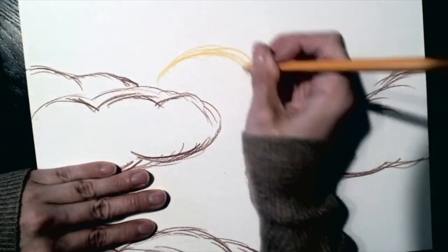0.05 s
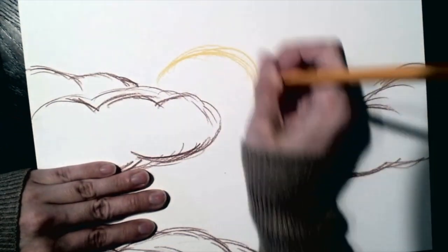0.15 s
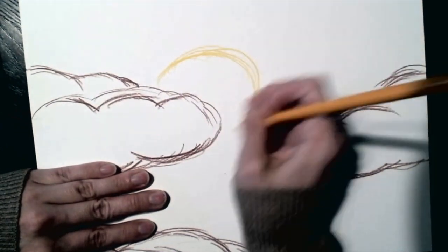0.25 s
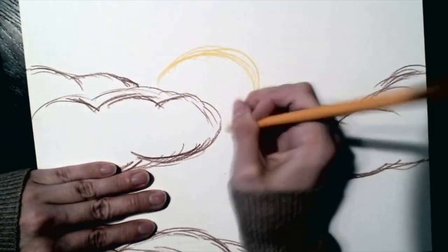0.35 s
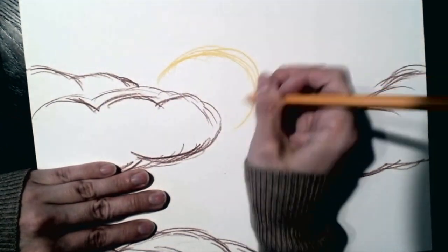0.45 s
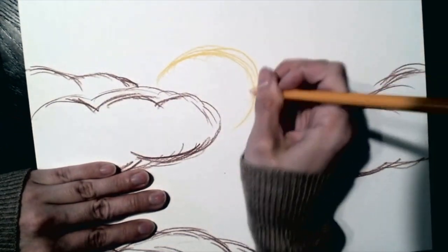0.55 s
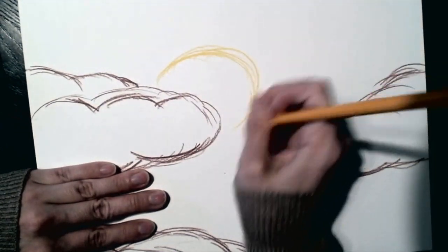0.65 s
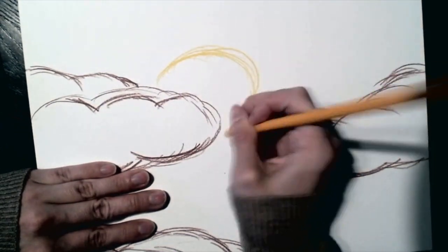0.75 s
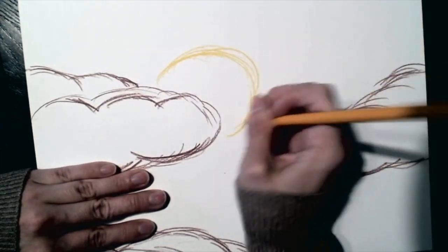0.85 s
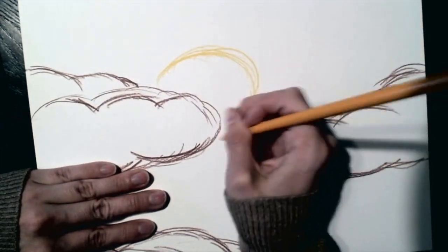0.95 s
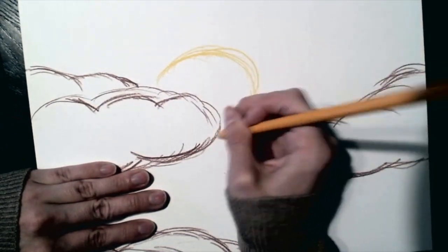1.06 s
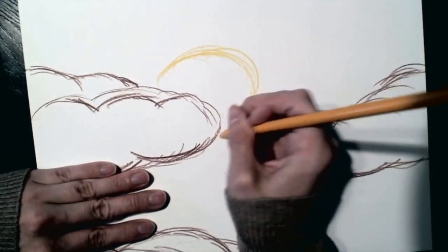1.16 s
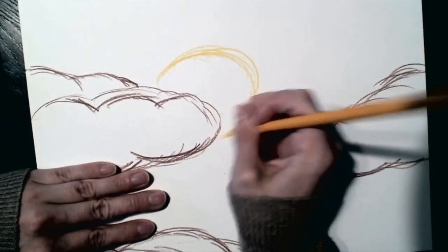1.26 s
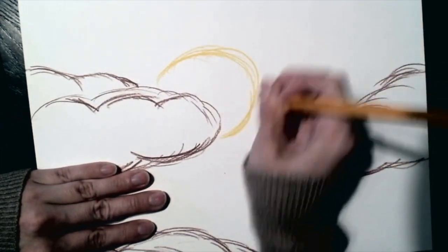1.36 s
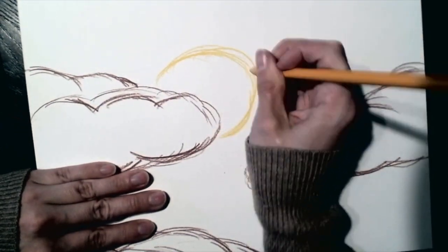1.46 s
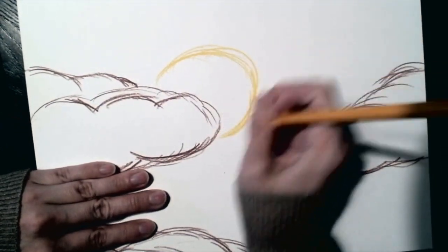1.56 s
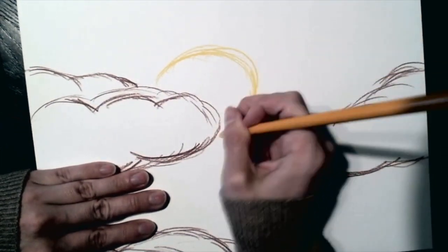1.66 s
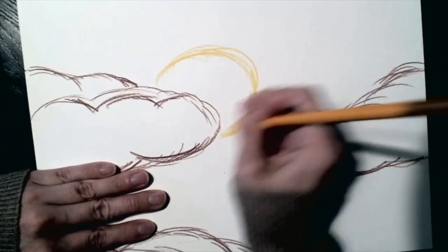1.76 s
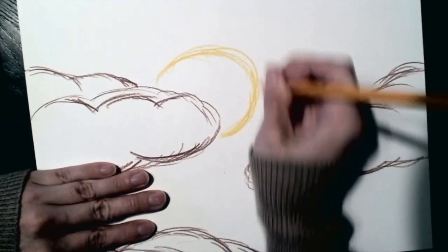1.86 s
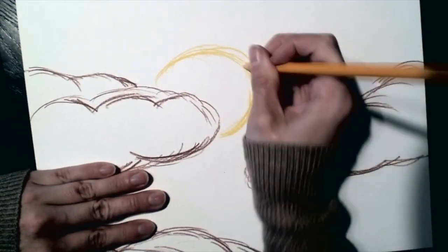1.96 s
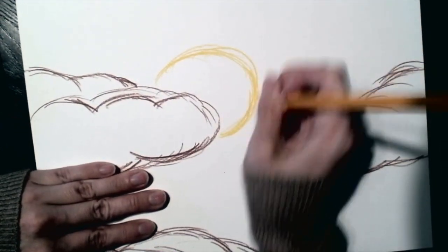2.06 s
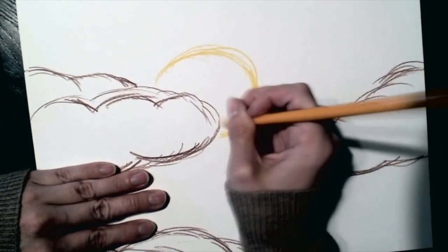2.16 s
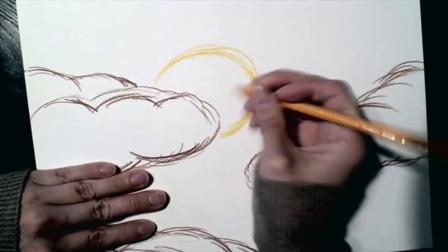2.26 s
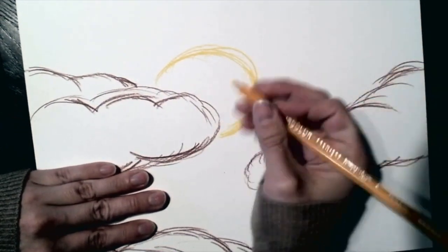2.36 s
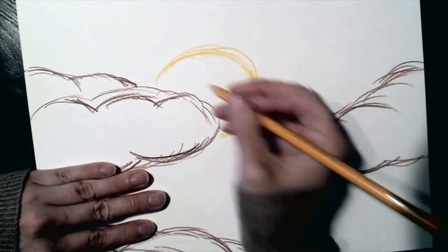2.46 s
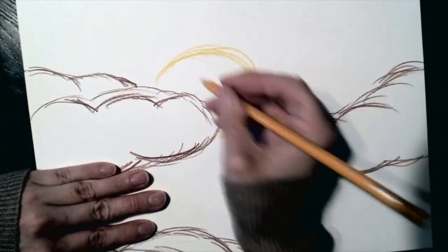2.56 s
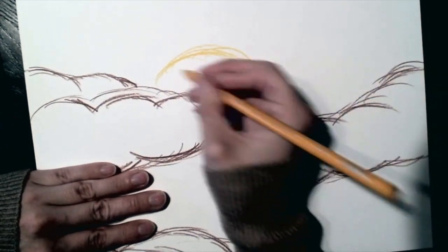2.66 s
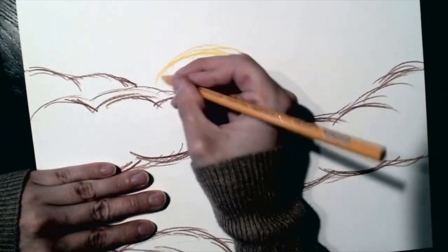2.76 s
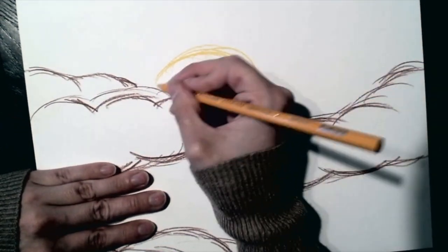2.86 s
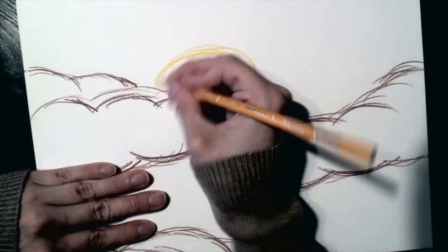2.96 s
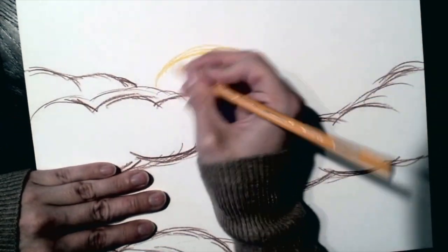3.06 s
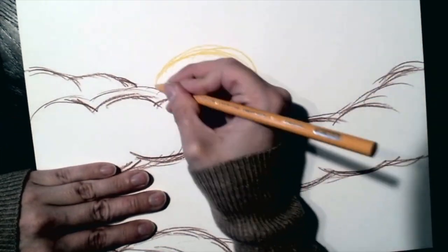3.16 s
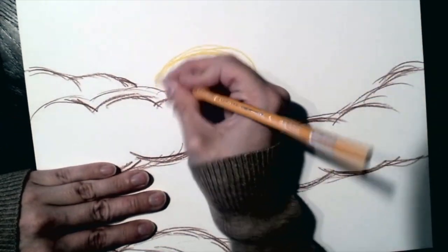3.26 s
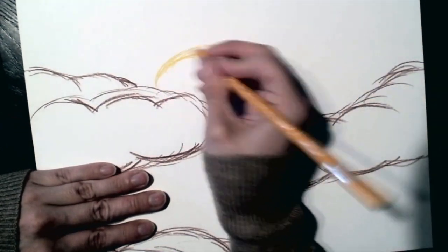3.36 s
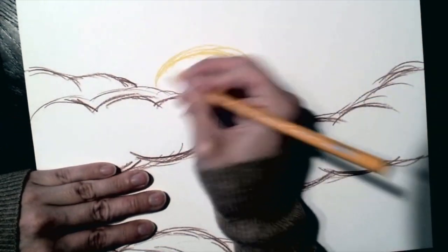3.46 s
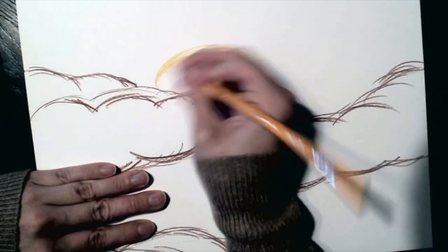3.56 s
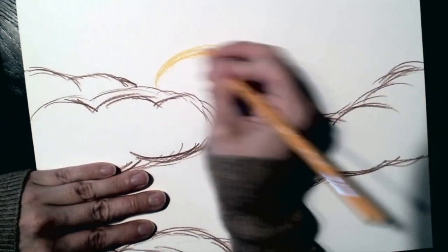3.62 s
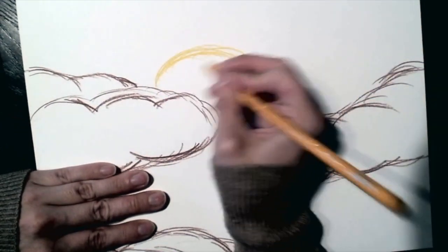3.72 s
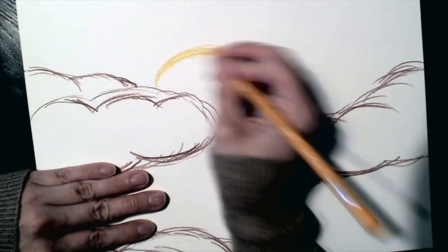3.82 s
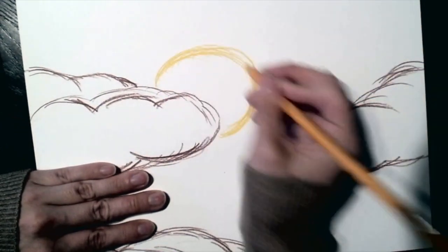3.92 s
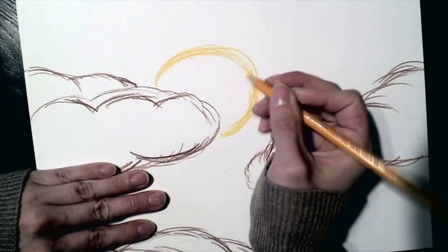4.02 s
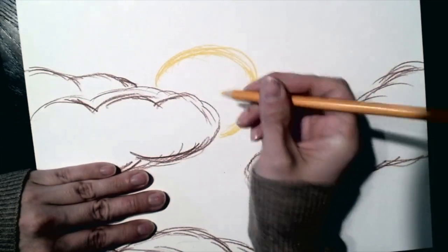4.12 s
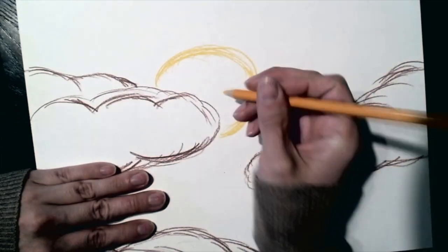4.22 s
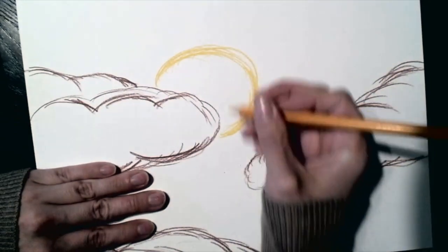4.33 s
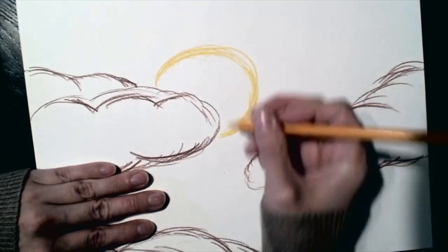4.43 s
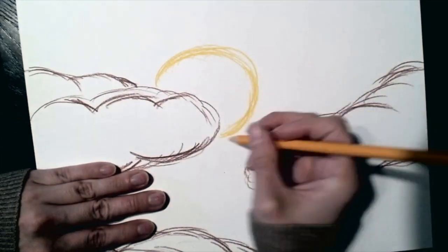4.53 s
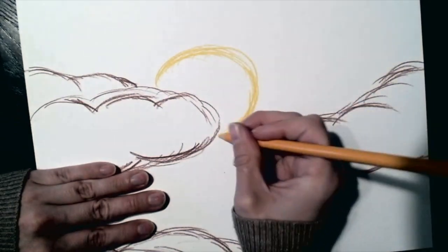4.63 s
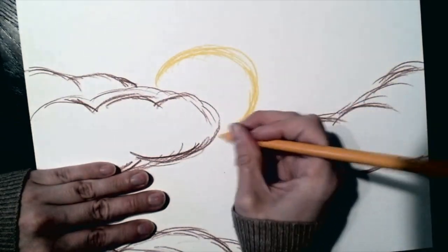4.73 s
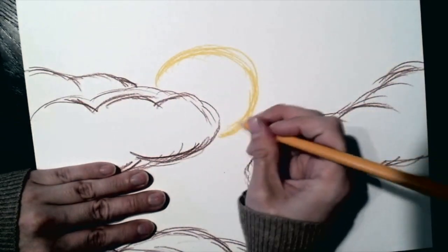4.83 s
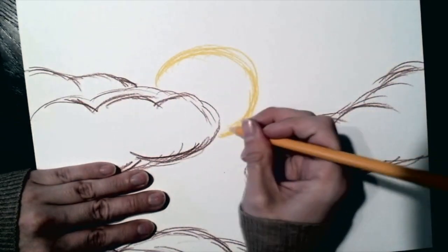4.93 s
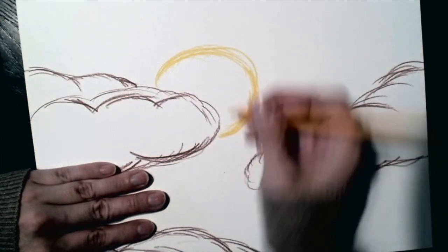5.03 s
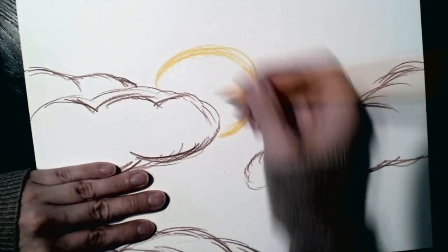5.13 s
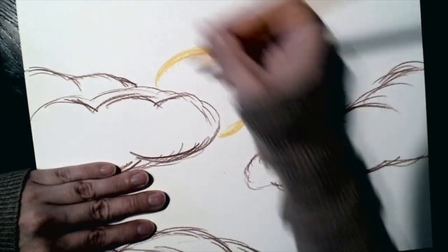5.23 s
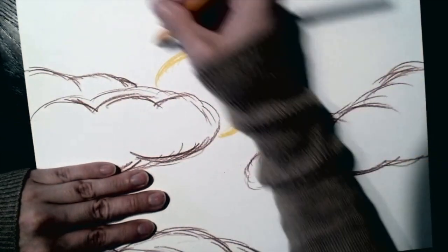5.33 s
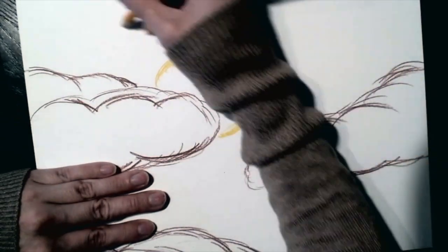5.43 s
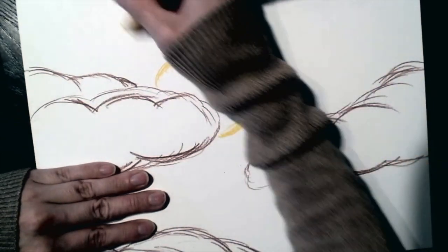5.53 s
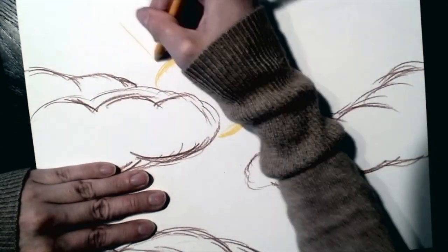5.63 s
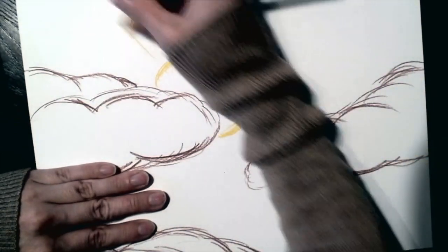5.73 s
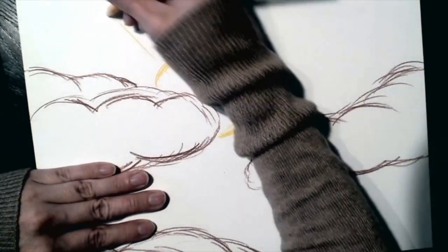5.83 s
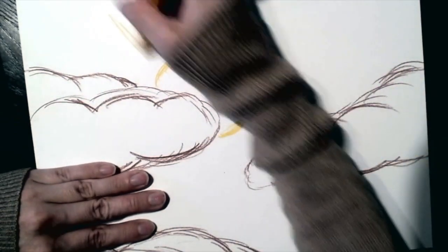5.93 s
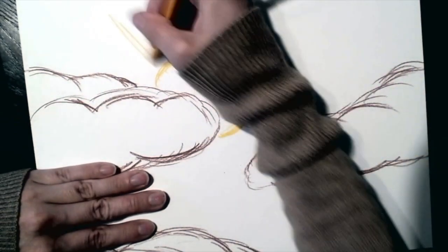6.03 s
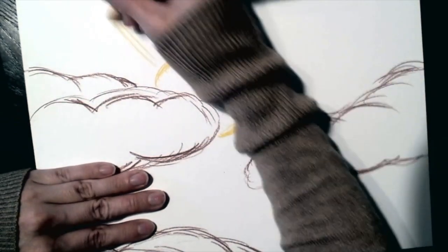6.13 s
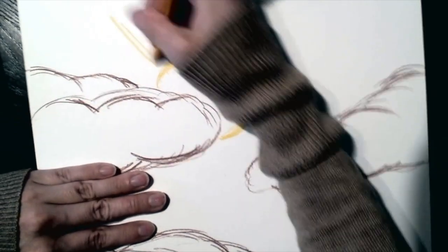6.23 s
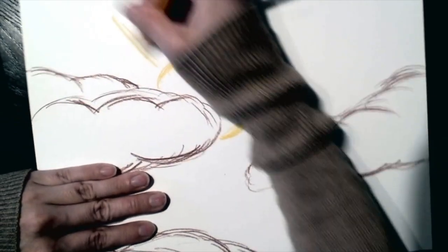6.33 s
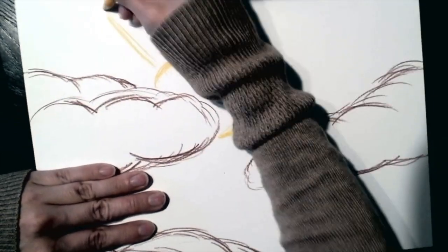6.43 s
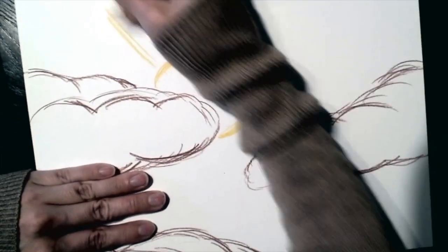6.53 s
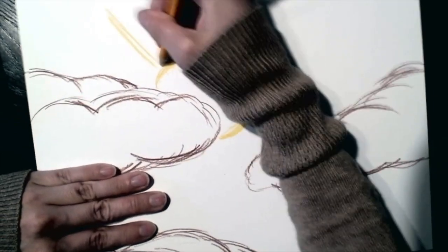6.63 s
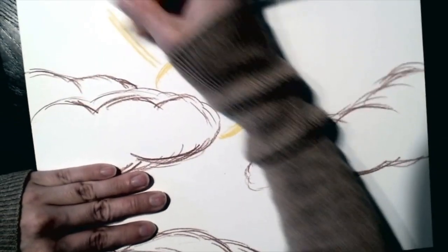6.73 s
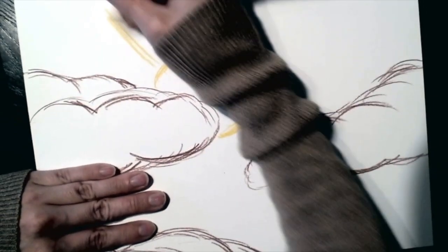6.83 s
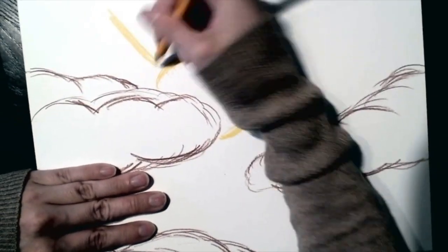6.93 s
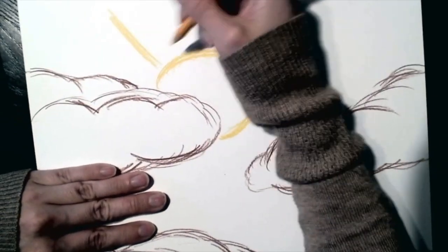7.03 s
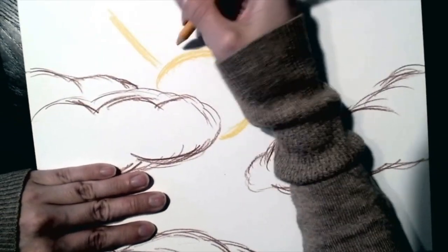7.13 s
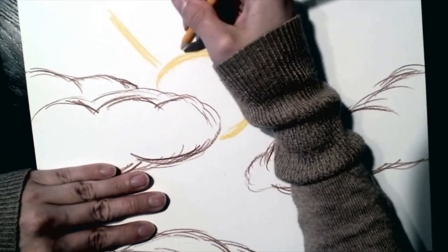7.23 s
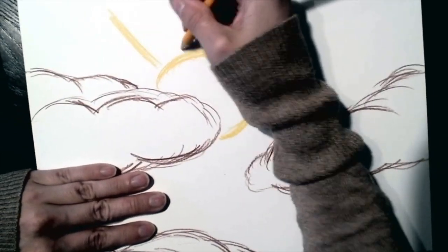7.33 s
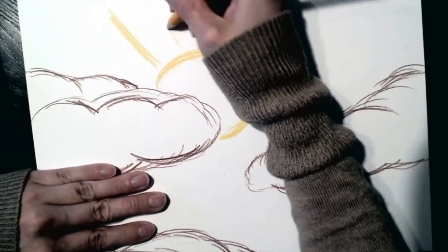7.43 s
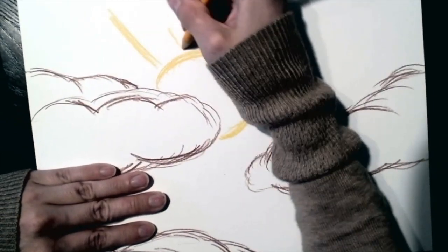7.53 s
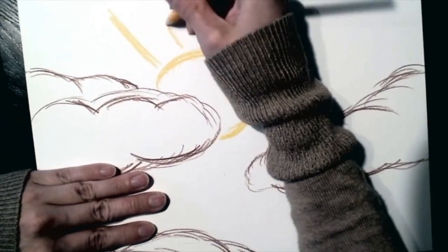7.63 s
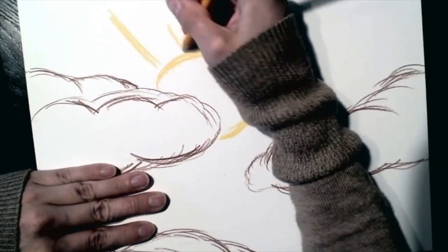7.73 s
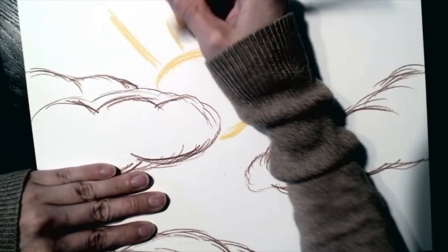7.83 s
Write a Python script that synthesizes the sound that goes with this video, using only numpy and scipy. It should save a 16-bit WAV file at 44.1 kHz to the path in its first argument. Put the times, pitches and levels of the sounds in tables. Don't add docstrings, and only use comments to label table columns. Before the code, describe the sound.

Close and dry in a quiet room, a faint low appliance hum throbs unevenly, with a barely audible thin electronic whine. At 0.1 seconds a pencil tip knocks softly on paper over a wooden table and rubs a grainy stroke; lighter ones follow at 0.5 and 0.9, each with a dull tap. A slow pull at 1.2 leads into three smoother, sustained arcs from 1.5 to 2.2. Then only soft hand and sleeve brushes until faint short strokes at 2.9, 3.2 and 3.5, with clear woody knocks at 3.2, 3.5 and 3.8, the last hardest and starting a light arc. From 4 to 5.4 it is nearly silent, with faint brushes and tiny touches. From 5.5 to 6.9 rapid back-and-forth shading rasps, louder and more resonant, about six strokes a second, with small pings and squeaks. A sleeve brush follows, then a tap at 7.3 and quick light dabs to the end.

```python
import sys
import numpy as np
from scipy import signal
from scipy.fft import rfft, irfft
from scipy.io import wavfile
from scipy.ndimage import uniform_filter1d

SR = 44100
rng = np.random.default_rng(int(sys.argv[2]) if len(sys.argv) > 2 else 0)


def undo_db(level):
    steps = np.asarray(level, float) / 20
    return 10 ** steps


def generate_wav(signal):
    frames = np.transpose(np.atleast_2d(signal))
    scaled = np.clip(frames, -1, 1) * 32767
    pcm = np.round(scaled).astype(np.int16)
    wavfile.write(sys.argv[1], SR, pcm)


N = 347508

# start in seconds, speeding up in seconds, slowing down in seconds,
# paper hiss at full speed in dB, pressure as shaft ring relative to the hiss in dB.
STROKES = [
    (.12, 0.17, 0.061, -55.5, 8),
    (.52, 0.14, 0.11, -58.5, 5.5),
    (.865, 0.1, 0.083, -62, 3),
    (2.919, 0.051, 0.079, -65.5, 10),
    (3.22, 0.083, 0.11, -64, 9),
    (3.509, 0.076, 0.13, -59.5, 3),
]
ARCS = [
    (1.465, 0.13, 0.097, -56.5, 5.5),
    (1.70, 0.15, 0.085, -56, -0.5),
    (1.945, 0.15, 0.076, -57, 4.5),
    (3.78, 0.076, .13, -61, 0),
]
SHADING = [
    (1.2, 0.24, 0.018, -58.5, 4),
    (5.51, 0.079, 0.084, -59, 12),
    (5.665, 0.11, 0.034, -55.5, 14.5),
    (5.822, 0.041, 0.11, -52.5, 16),
    (5.978, 0.097, 0.051, -53, 15),
    (6.139, 0.039, 0.12, -53, 10.5),
    (6.299, 0.099, 0.052, -52.5, 15),
    (6.46, 0.051, 0.12, -52, 11),
    (6.624, 0.11, 0.032, -53.5, 14.5),
    (6.776, 0.039, 0.095, -53, 12),
]
DABS = [
    (7.315, .065, 0.034, -63.5, 1),
    (7.418, 0.021, 0.095, -61.5, 4.5),
    (7.523, 0.053, 0.046, -60, 6.5),
    (7.628, 0.016, 0.11, -60.1, 9),
    (7.735, 0.053, 0.036, -58.5, 10),
    (7.827, 0.027, 0.046, -57.5, 6),
]
# start in seconds, speeding up in seconds,
# slowing down in seconds, hiss in dB, table rumble relative to the hiss in dB.
BRUSHES = [(-.05, 0.06, 0.17, -63.5, 1), (.3, 0.059, 0.21, -65, 3), (.75, 0.05, 0.077, -65.5, 3),
           (1.0, 0.044, 0.048, -73, -4), (2.12, 0.056, 0.55, -69, 7.5), (2.42, 0.21, .08, -68.5, -11),
           (2.6, 0.11, .07, -67, -5), (3.1, .05, 0.036, -73.5, -6), (3.4, .07, 0.083, -67.5, -5),
           (3.699, 0.057, 0.012, -61.5, 0), (3.95, 0.044, 0.13, -69.5, 4), (4.28, 0.069, 0.055, -76, 3),
           (4.72, 0.069, 0.074, -70, 9.5), (4.93, 0.09, 0.061, -75, 0.5), (5.285, 0.038, .1, -67, 4),
           (5.35, 0.089, 0.063, -66, -14), (6.87, 0.027, .14, -60, 8), (6.999, 0.032, 0.17, -68.5, 7)]
# time in seconds, rumble relative to hiss in dB.
SPOT = [(0, 10.5), (.7, 5), (1.0, 1), (1.3, 15), (1.42, 13.5), (1.6, 13), (2.1, 11.5), (3.0, 18),
        (3.33, 14.5), (3.55, 25), (3.63, 8.5), (3.84, 20), (3.92, 4.5), (5.5, 12.5), (6.2, 11), (6.9, 11.5),
        (7.4, 10.5), (7.88, 13)]
# time in seconds, grip from 0 (long and loose) to 1 (short and tight).
GRIP = [(0, 0.18), (2.3, 0.095), (2.9, 0.55), (4, 0.33), (5.4, 0.46), (6.9, 0.41), (7.3, 0.35),
        (7.88, 0.43)]
# time in seconds, peak in dB, middle modes relative in dB,
# shaft modes relative in dB, shaft pitch in Hz.
EDGE_TAPS = [
    (0.125, -18, -23, -30, 1010),
    (0.528, -22, -23, -31, 988),
    (0.875, -15, -7, -7, 986),
    (4.502, -58, -18, 0, 1420),
]
INNER_TAPS = [
    (1.183, -34.5, -11, -37, 930),
    (3.194, -18.5, -22.5, -39, 1460),
    (3.492, -16.5, -16.5, -12.5, 1305),
    (3.785, -12.5, -12, -4.5, 1350),
    (4.724, -39, -20, -24, 1020),
    (5.484, -26.5, -13, -18, 1120),
    (7.32, -24, -16.5, -4, 1176),
]
# time in seconds, peak in dB, pitch in Hz.
SNAGS = [(0.2638, -40.5, 980), (0.2868, -38.5, 1060), (0.6583, -51, 1100), (1.5932, -39.5, 1003),
         (1.6318, -41.5, 1100), (5.5937, -40, 1050), (5.7424, -34.5, 1076), (5.768, -35, 1107),
         (5.8644, -35, 1106), (5.883, -39, 1180), (6.0397, -41, 1320), (6.0688, -36.5, 1040),
         (6.1758, -42, 994), (6.1983, -39, 1100), (6.3687, -37.5, 1344), (6.4013, -45, 1110),
         (6.6905, -50, 1450), (6.8076, -39, 1020), (6.839, -43, 1170), (7.7843, -39.5, 1300)]
# time in seconds, peak in dB, pitch in Hz.
SQUEAKS = [(5.8634, -37.5, 2490), (5.879, -37, 2705), (5.8994, -48, 2840), (6.0518, -46, 2710),
           (6.193, -44.5, 2760), (6.3699, -47.5, 2660), (6.5146, -47, 2660), (6.7, -61.5, 2690),
           (6.8209, -39.5, 2740), (6.8444, -48, 2710)]
# time in seconds, level in dB, pitch in Hz.
THUDS = [
    (5.26, -58, 45),
    (5.985, -55, 40),
    (3.79, -62, 55),
]
# pitch in Hz, level in dB, time to fall 60 dB in seconds.
TABLE = [(167, -5.5, .06), (196, -1, 0.092), (235.2, 2, 0.052), (272.5, 2, 0.059), (350, 1, 0.046),
         (384, 1, 0.048), (461, -12, 0.048)]
MIDDLE = [(570, 0.5, 0.045), (646, -2, 0.0225), (769, 4.5, 0.035)]
SHAFT = [(1017.3, -7, 0.013), (1060, 0.5, 0.02), (1170, -1.5, 0.029), (1312, -2, 0.044), (1461, -3, 0.059),
         (1555, -8, 0.14)]
TIP = [(1580, 4.5, 0.0074), (1986, 3, 0.014), (2113, 3.5, 0.015), (2465, 3.5, 0.01), (2660, -5.5, 0.044),
       (2838, -1.5, 0.014)]
# frequency in Hz, level in dB per Hz.
HISS = [(1710, -10), (2900, -22.5), (3110, -9.5), (4360, -7), (4580, -8.5), (4990, -6), (5460, -11),
        (7040, -6.5), (8160, -13.5), (10400, -12.5), (13000, -18), (15200, -12), (15600, -15)]
# frequency in Hz, level in dB per Hz.
AIR = [(15, -62), (25, -43), (59, -17), (90, -4.5), (165, -8), (240, -13.5), (420, -15), (620, -30),
       (1050, -27.5), (1600, -29), (2900, -34.5), (6720, -38), (12100, -46.5), (15000, -64.5)]
# time in seconds, level in dB.
HUM = [(0.0, -58), (0.7, -55.5), (1.07, -61), (1.97, -53), (2.85, -62.5), (3.51, -57.5), (4.45, -62),
       (5.57, -61), (5.77, -55), (6.58, -51), (7.2, -58.5), (7.88, -58)]
# frequency in Hz, rms level in dB.
GATE = [(12800, -104), (13200, -101), (13400, -83), (13900, -84.5), (14600, -76), (15300, -84.5),
        (15700, -88)]

# (hiss as power of speed, overlap at the turn s,
# pressure peak from full speed 0 to mid stroke 1, its share of the stroke)
STROKE_WAY, ARC_WAY = (1.1, 0.0046, 0.26, 0.2), (0.35, 0.0048, 0.24, 0.2)
SHADING_WAY, DAB_WAY = (1.0, 0.012, 0.88, 0.21), (1.38, 0.0071, 0.31, 0.22)
BRUSH_WAY = (1.5, 0.012)
# (table fade start to end dB, shaft ring when eased dB, top of the hiss when eased dB)
STROKE_COLOUR, ARC_COLOUR = (-3.5, -15, 0.3), (0.3, -9.5, -1.5)
SHADING_COLOUR, DAB_COLOUR = (-9.5, -14.5, 1), (-6, -17, 0.3)
TABLE_EASED_DB, TIP_EASED_DB = -5, -3.5
TIP_BY_PRESS = 0.11
BRUSH_SHAFT_DB, BRUSH_TIP_DB, BRUSH_TOP_DB, STILL_DB = -6.0, -4.5, -4, -98.5

EDGE_HZ, INNER_HZ = 370, 302.4
TABLE_THUMP_T60_S, SHAFT_THUMP_T60_S, CONTACT_S = 0.033, 0.018, 0.0012
TICK_DB, CLICK_DB = -31, -38.5
LEAD_DB, LEAD_BY_SHAFT = -28.5, 0.21

HUM_HZ = 120.5
BEAT_HZ, BEAT_DB = 111.8, -13
OVERTONE_HZ, OVERTONE_DB = 226, -6.5
FAN_HZ, FAN_DB = 248.5, -11
FLOOR_RUMBLE_HZ, FLOOR_RUMBLE_DB = 57.4, -19
WHINE_HZ, WHINE_DB = 2724, -85
AIR_DB = -64
ROOM_T60_S, ROOM_DB = 0.15, -13
TOP_HZ, GATE_STEP_HZ = 15750, 260


def rms_one(x):
    return x / np.sqrt(np.mean(x ** 2) + 1e-20)


def in_time(rows):
    s, *columns = np.transpose(rows)
    return [np.interp(np.arange(N) / SR, s, c) for c in columns]


def drift(rate):
    r = np.exp(-2 * np.pi * rate / SR)
    noise = rng.standard_normal(N + SR)
    return rms_one(signal.lfilter([1], [1, -2 * r, r * r], noise)[SR:])


def ring(force, hz, t60):
    r, w = undo_db(-60 / (t60 * SR)), 2 * np.pi * hz / SR
    return signal.lfilter([0, np.sin(w)], [1, -2 * r * np.cos(w), r * r], force + 1e-18)


def body(force, modes, turn=-1, lean_db=0):
    places = np.linspace(-1, 1, len(modes))
    out = 0
    for k, (hz, db, t60) in enumerate(modes):
        out = out + turn ** k * undo_db(db + lean_db * places[k]) * ring(force, hz, t60)
    return out


def coloured(x, spectrum):
    hz, db = np.transpose(spectrum)
    grid = np.maximum(np.fft.rfftfreq(N, 1 / SR), 1)
    gain = undo_db(np.interp(np.log(grid), np.log(hz), db))
    return rms_one(irfft(rfft(x) * gain, N))


def band_pass(hz, octaves):
    edges = hz * 2.0 ** (np.array([-0.5, 0.5]) * octaves)
    return signal.butter(2, edges, "band", fs=SR, output="sos")


def around(x, hz, octaves):
    return signal.sosfilt(band_pass(hz, octaves), x)


def wavering(hz, flutter_db, flutter_hz):
    level = np.sqrt(2) * undo_db(flutter_db * drift(4.7))
    cycles = np.cumsum(hz + flutter_hz * drift(9.5)) / SR
    return level * np.sin(2 * np.pi * cycles)


def room_tone():
    hum_db = in_time(HUM)[0]
    hum = wavering(HUM_HZ, flutter_db=2.2, flutter_hz=1.0)
    hum += undo_db(OVERTONE_DB) * wavering(OVERTONE_HZ, flutter_db=2.0, flutter_hz=1.5)
    hum += undo_db(BEAT_DB) * wavering(BEAT_HZ, flutter_db=2.0, flutter_hz=0.6)
    hum += undo_db(FAN_DB) * wavering(FAN_HZ, flutter_db=2.0, flutter_hz=1.0)
    rumble = rms_one(around(rng.standard_normal(N), FLOOR_RUMBLE_HZ, 1.1))
    hum += undo_db(FLOOR_RUMBLE_DB + 0.7 * (hum_db + 56.5)) * rumble
    whine = wavering(WHINE_HZ, flutter_db=0.7, flutter_hz=0.3)
    whine *= undo_db(WHINE_DB + 0.6 * (hum_db + 59))
    air = coloured(rng.standard_normal(N), AIR)
    return undo_db(hum_db) * hum + whine + undo_db(AIR_DB + 1.0) * air


def sweep(t, s, rise, fall, db, by_speed, overlap):
    late = t - s - rise
    phase = np.where(late < 0, late / (rise + overlap), late / (fall + overlap))
    speed = np.maximum(np.cos(np.pi / 2 * np.clip(phase, -1, 1)), 0)
    return undo_db(db) * speed ** by_speed * (np.abs(phase) < 1)


def hand():
    t = np.arange(0, N / SR + 0.002, 0.001)
    power = undo_db(2 * STILL_DB) * np.ones((5, len(t)))
    spot_db = np.interp(t, *np.transpose(SPOT))
    kinds = ((STROKES, STROKE_WAY, STROKE_COLOUR), (ARCS, ARC_WAY, ARC_COLOUR),
             (SHADING, SHADING_WAY, SHADING_COLOUR), (DABS, DAB_WAY, DAB_COLOUR))
    for rows, (by_speed, overlap, midway, share), (fade_db, shaft_db, top_db) in kinds:
        for s, rise, fall, db, press_db in rows:
            along = np.clip((t - s) / (rise + fall), 0, 1) - 0.5
            hardest = s + rise + midway * (fall - rise) / 2
            eased = 1 - np.exp(-0.5 * ((t - hardest) / (share * (rise + fall))) ** 2)
            rel_db = np.array([0 * t,
                               spot_db + fade_db * along + TABLE_EASED_DB * eased,
                               press_db + shaft_db * eased,
                               TIP_BY_PRESS * press_db + TIP_EASED_DB * eased,
                               top_db * (eased - 0.5)])
            power += (sweep(t, s, rise, fall, db, by_speed, overlap) * undo_db(rel_db)) ** 2
    for *row, table_db in BRUSHES:
        rel_db = np.array([[0], [table_db], [BRUSH_SHAFT_DB], [BRUSH_TIP_DB], [BRUSH_TOP_DB]])
        power += (sweep(t, *row, *BRUSH_WAY) * undo_db(rel_db)) ** 2
    db = 10 * np.log10(power)
    return in_time(np.transpose([t, db[0], *(db[1:] - db[0])]))


def grain(per_s, spread_db):
    sizes = undo_db(spread_db * np.minimum(rng.exponential(1, N), 5)) * rng.choice([-1, 1], N)
    return sizes * (rng.random(N) < per_s / SR)


def patchy(x, patch_db, top_db):
    edges = np.geomspace(1500, 16500, 9)
    count = len(edges) - 1
    out = 0
    for k, pair in enumerate(zip(edges, edges[1:])):
        band = signal.butter(2, pair, "band", fs=SR, output="sos")
        swell_db = patch_db * (drift(8.1) + 0.48 * drift(11))
        out = out + undo_db(swell_db + top_db * (k / count) ** 2) * signal.sosfiltfilt(band, x)
    return out


def rubbed(modes, level_db, per_s, spread_db, lumpy_db, lean_db=0):
    force = grain(per_s, spread_db) * undo_db(lumpy_db * drift(29))
    loudness = uniform_filter1d(body(force, modes, lean_db=lean_db) ** 2, size=SR)
    return body(force * undo_db(level_db), modes, lean_db=lean_db) / np.sqrt(loudness)


def strokes():
    hiss_db, table_db, shaft_db, tip_db, top_db = hand()
    tight = 2 * in_time(GRIP)[0] - 1
    paper = coloured(grain(per_s=9000, spread_db=2.0), HISS)
    hiss = undo_db(hiss_db - 1.76) * patchy(paper, patch_db=2.0, top_db=top_db)
    table = rubbed(TABLE, hiss_db + table_db - 2.3, per_s=320, spread_db=2.0, lumpy_db=1.0,
                   lean_db=-1.0 - 4.9 * tight)
    middle_db = (table_db + shaft_db) / 2 - 17.5 - 8.7 * tight
    middle = rubbed(MIDDLE, hiss_db + middle_db, per_s=1500, spread_db=2.0, lumpy_db=3.5,
                    lean_db=2.5 * tight)
    shaft = rubbed(SHAFT[:-1], hiss_db + shaft_db - 4.0, per_s=1300, spread_db=2.5, lumpy_db=0.5,
                   lean_db=15.0 * tight - 7)
    tip = rubbed(TIP, hiss_db + tip_db - 0.6, per_s=6900, spread_db=-1.5, lumpy_db=-2.0,
                 lean_db=4.7 * tight)
    return hiss, table + middle + shaft + tip


def taps():
    out, t = np.zeros(N), np.arange(SR // 3) / SR
    push = np.sin(np.pi * np.clip(t / CONTACT_S, 0, 1)) ** 2
    sharp = push ** 3
    landings = [(*r, EDGE_HZ) for r in EDGE_TAPS] + [(*r, INNER_HZ) for r in INNER_TAPS]
    for s, peak_db, middle_db, shaft_db, shaft_hz, table_hz in landings:
        by_shaft_db = LEAD_BY_SHAFT * shaft_db
        tick = around(rng.standard_normal(len(t)) * np.exp(-t / 0.002), 2000, 1.8)
        click = around(rng.standard_normal(len(t)) * np.exp(-t / 0.0012), 7000, 1.6)
        knock = undo_db(TICK_DB) * tick + undo_db(CLICK_DB + by_shaft_db) * click

        table = body(push, TABLE, turn=1) + undo_db(7.0) * ring(push, table_hz, TABLE_THUMP_T60_S)
        table = around(table, table_hz, 1.26)
        middle = around(body(push, MIDDLE, turn=0.93), 670, 3.02)
        lead = around(body(sharp, TIP), 2100, 0.64)
        shaft = body(sharp, SHAFT, turn=0.89) + undo_db(4.5) * ring(sharp, shaft_hz, SHAFT_THUMP_T60_S)
        shaft = around(around(shaft, shaft_hz, 0.66), shaft_hz, 0.66)
        for rung, rel_db in ((table, -1.5), (middle, middle_db + 2),
                             (lead, LEAD_DB + by_shaft_db), (shaft, shaft_db + 1.5)):
            knock = knock - undo_db(rel_db) * rung / np.abs(rung).max()
        i = round(s * SR)
        out[i:i + len(t)] += (undo_db(peak_db) * knock)[:N - i]
    return out


def room(x):
    t = np.arange(SR // 2) / SR
    tail = rng.standard_normal(len(t)) * undo_db(-60 * t / ROOM_T60_S) * np.minimum(t / 0.0023, 1)
    tail = signal.lfilter([1], [1, -0.6], tail)
    return undo_db(ROOM_DB) * signal.fftconvolve(x, tail / np.sqrt(np.sum(tail ** 2)))[:N]


def snags():
    out, t = np.zeros(N), np.arange(SR // 30) / SR
    u = t / 0.0027
    swell = u * np.exp(1 - u)
    for s, peak_db, hz in list(SNAGS) + list(SQUEAKS):
        i = round(s * SR)
        packet = undo_db(peak_db + 1.0) * swell * np.sin(2 * np.pi * hz * t)
        out[i:i + len(t)] += packet[:N - i]
    return out


def thuds():
    out, t = np.zeros(N), np.arange(N) / SR
    for s, db, hz in THUDS:
        u = np.maximum(t - s, 0) / 0.026
        out += undo_db(db) * u ** 2 * np.exp(2 - 2 * u) * np.sin(2 * np.pi * hz * (t - s))
    return out


def scene():
    hiss, rub = strokes()
    knocks = taps() + snags()
    echo = room(knocks + undo_db(-4.0) * rub)
    return (hiss + rub + knocks + echo + thuds() + room_tone())[None]


def low_pass(x):
    return signal.sosfilt(signal.butter(12, 15910, fs=SR, output="sos"), x)


def record(dry):
    hz, _, frames = signal.stft(dry, SR, nperseg=2048)
    frames[:, hz >= TOP_HZ] = 0
    gate_hz, gate_db = np.transpose(GATE)
    frame_s = np.arange(frames.shape[-1]) * 1024 / SR
    grip = np.interp(frame_s, *np.transpose(GRIP))
    for low in np.arange(TOP_HZ - GATE_STEP_HZ, gate_hz[0], -GATE_STEP_HZ):
        band = (hz >= low) & (hz < low + GATE_STEP_HZ)
        level = np.sqrt(np.sum(np.abs(frames[:, band]) ** 2, axis=1, keepdims=True))
        wander_db = 4.0 * uniform_filter1d(rng.standard_normal(level.shape[-1]), size=4)
        grip_db = grip * (low - 14700) / 180
        frames[:, band] *= level > undo_db(np.interp(low, gate_hz, gate_db) + wander_db + grip_db)
    gated = signal.istft(frames, SR, nperseg=2048)[1][:, :N]
    return low_pass(gated)


dry = scene()
out = record(dry)
generate_wav(out)
```